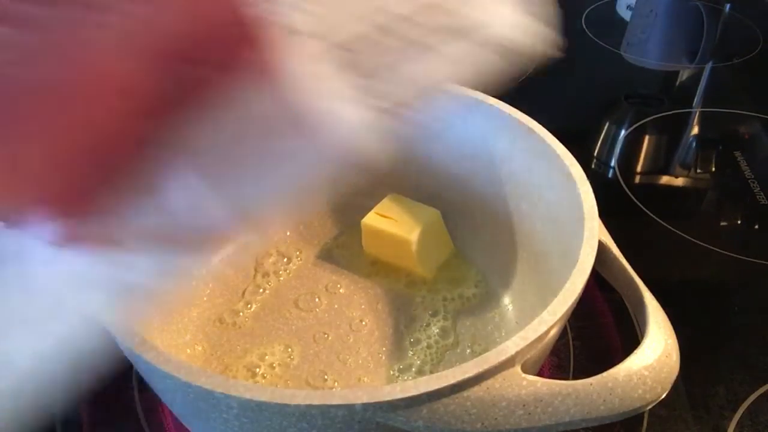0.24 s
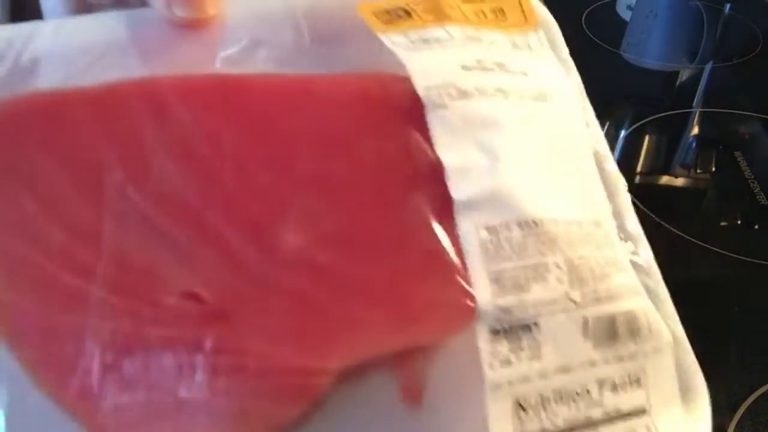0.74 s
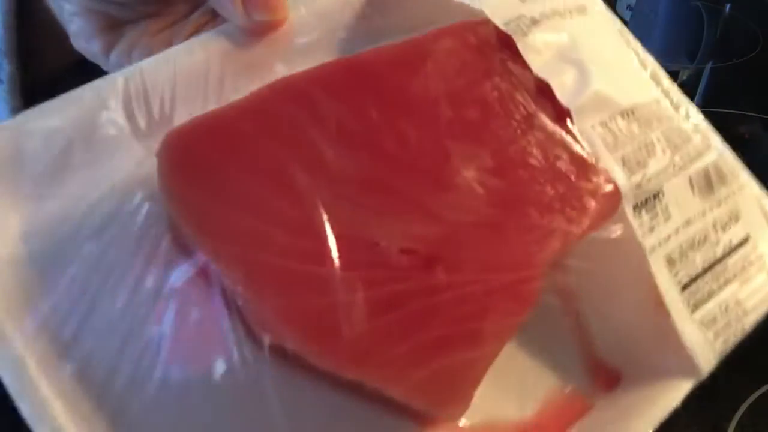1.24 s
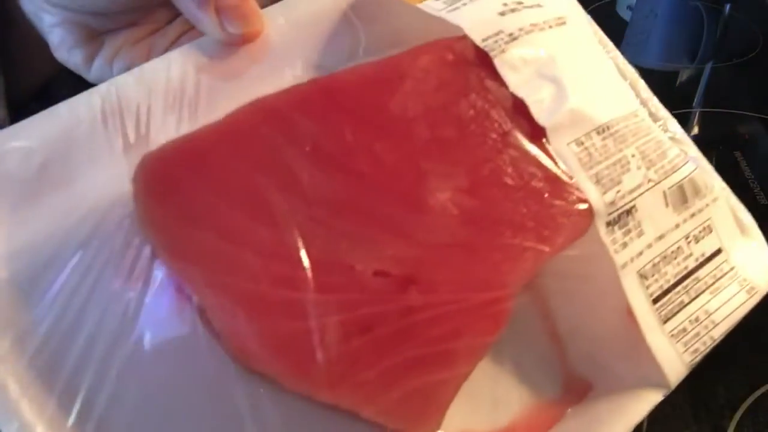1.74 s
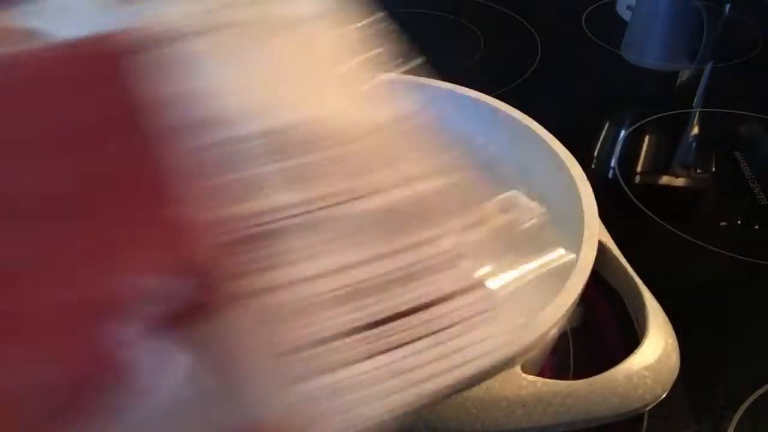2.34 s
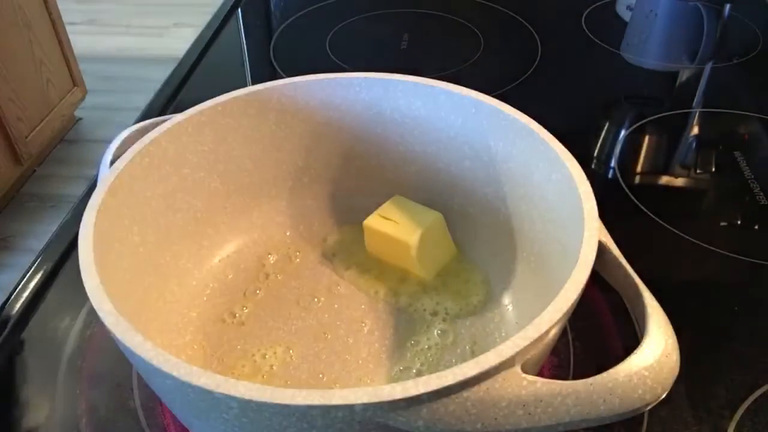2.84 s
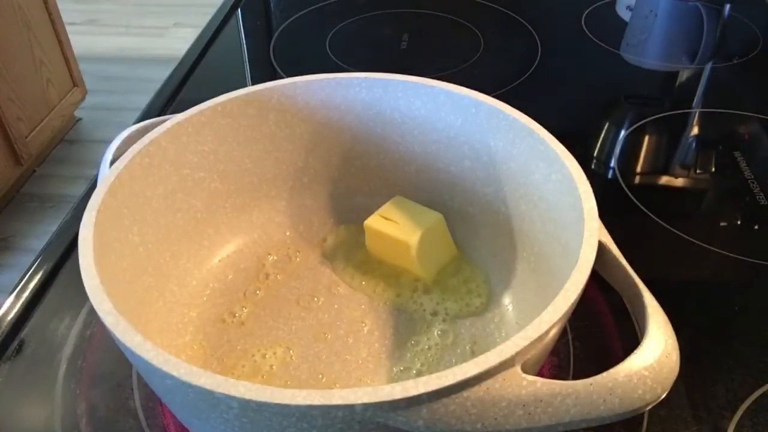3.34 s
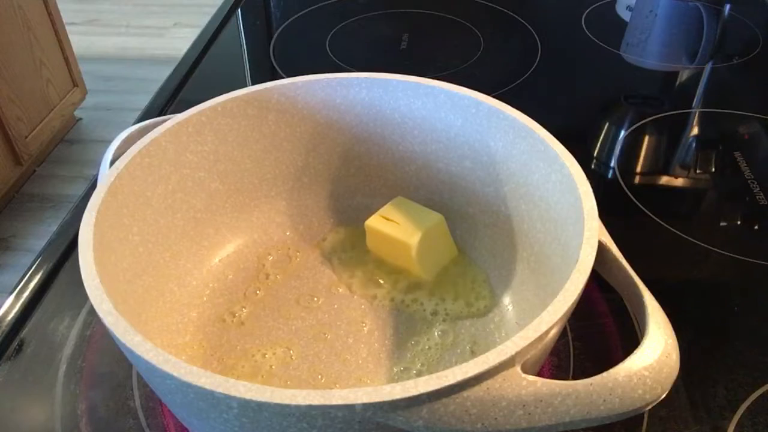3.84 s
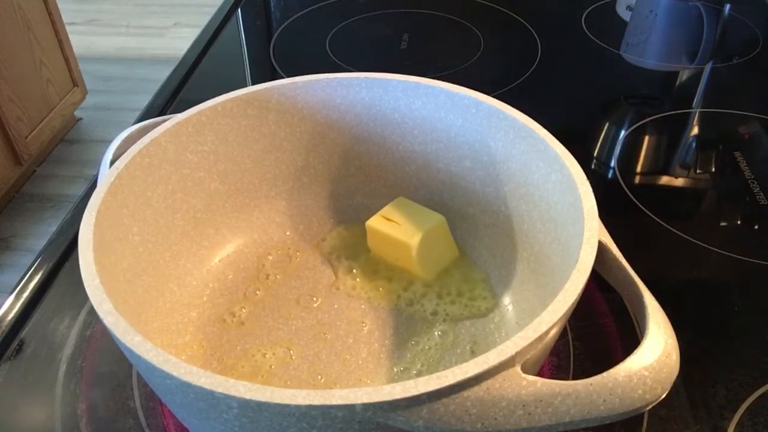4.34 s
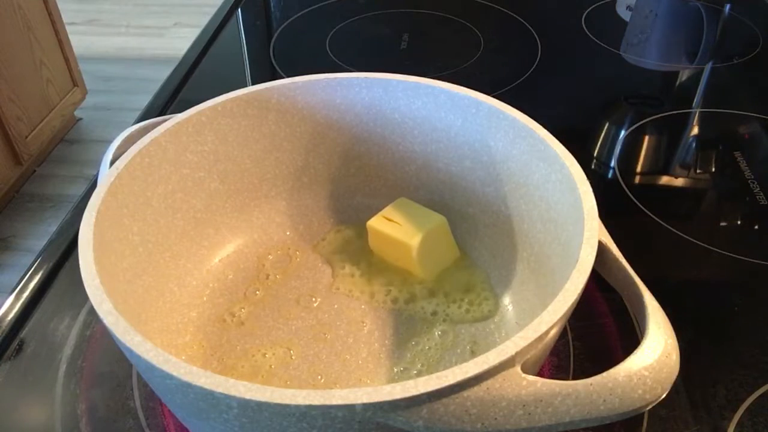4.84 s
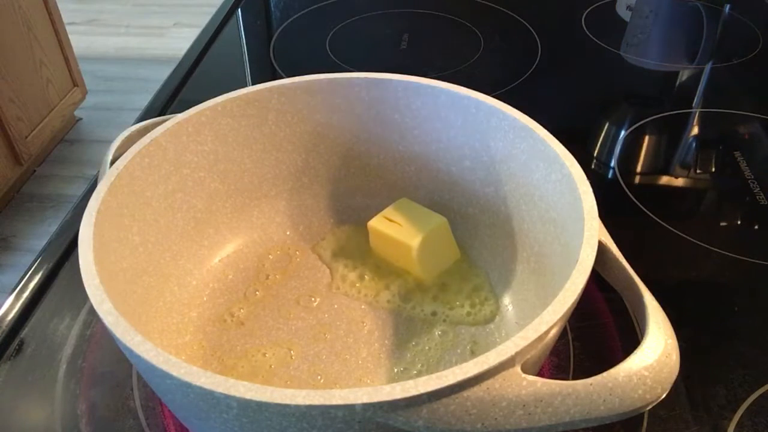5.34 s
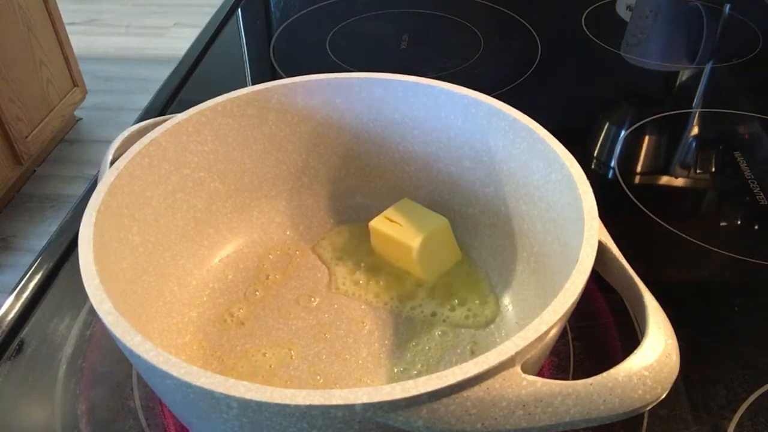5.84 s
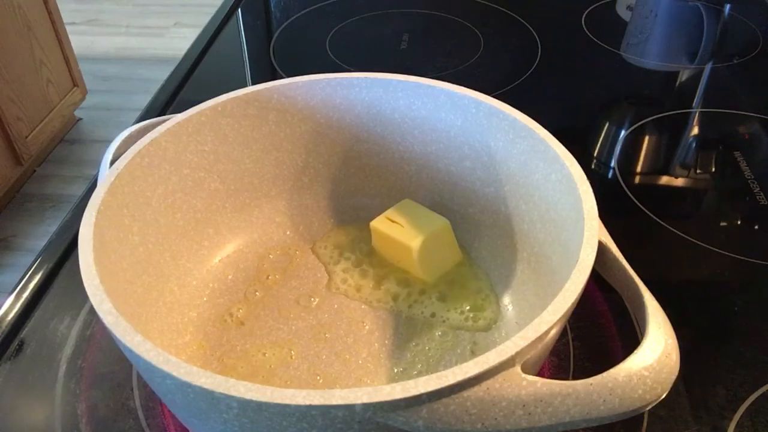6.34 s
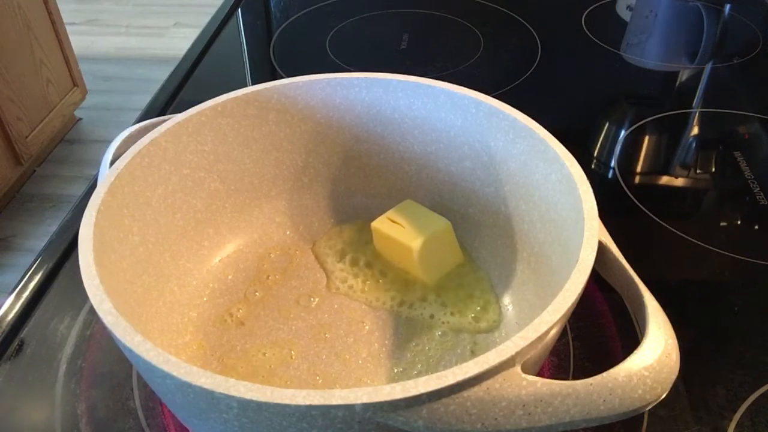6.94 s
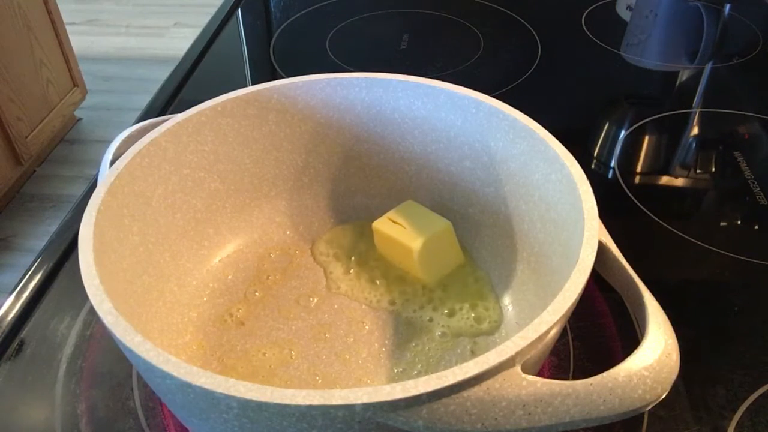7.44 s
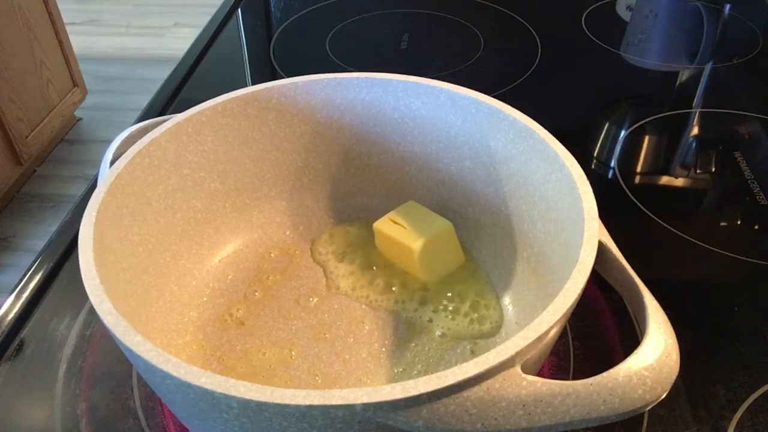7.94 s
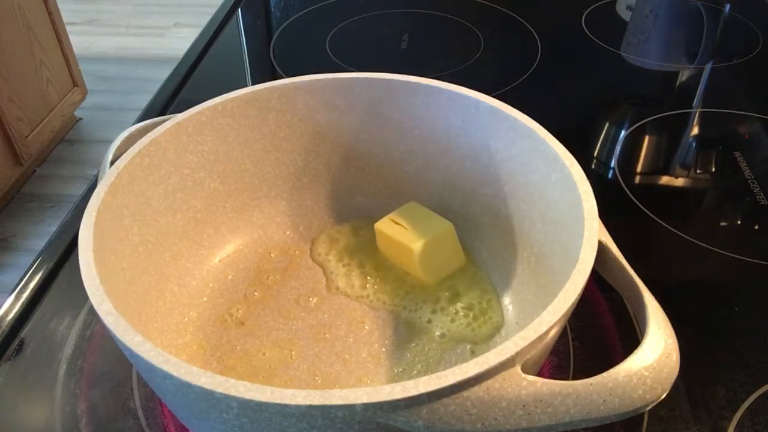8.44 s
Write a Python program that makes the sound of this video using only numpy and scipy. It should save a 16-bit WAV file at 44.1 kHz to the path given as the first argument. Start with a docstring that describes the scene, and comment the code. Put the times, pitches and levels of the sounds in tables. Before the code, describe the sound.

Close, crackly frying of butter dips and dulls for two seconds, returns bright, then a tray clacks down amid pops and light knocks.

```python
"""In a kitchen, one microphone above a hot pot on a humming glass hob: a lump of butter sizzles.
Steam bubbles bursting in the fat are short rings, in clumps, coloured by the pot; fat spits and sprays.
A plastic tray held over the pot for two seconds screens the sizzle, and cookware clinks lightly.
The tray is carried aside and set down with a clack, then softer handling knocks follow.
Blows are runs of tiny touches through hollow resonances; hum and room noise lie behind."""
import sys
import numpy as np
from scipy import signal
from scipy.fft import rfft, irfft
from scipy.io import wavfile

SR = 44100
rng = np.random.default_rng(int(sys.argv[2]) if len(sys.argv) > 2 else 0)


def unload_wav(signal):
    """Save mono or channel-first audio to the path in sys.argv[1] as 16-bit WAV at rate SR, clipped to [-1, 1]."""
    wavfile.write(
        sys.argv[1],
        SR,
        np.round(np.clip(np.atleast_2d(signal).T, -1, 1) * 32767).astype(np.int16),
    )


N = 383229
T = np.arange(N) / SR   # time in s of every sample

# sizzle straight from the pot: pitch_hz [Hz], density_db [dB per Hz]
OPEN_COLOUR = [(150, -36), (490, -28), (1100, -22), (1600, -21.5), (2400, -7), (3000, -2.5), (4200, 2),
               (5000, 0.5), (6600, 0), (8200, -11), (9800, -13), (10400, -21), (11300, -15.5), (15800, -25)]
# sizzle arriving around the tray: pitch_hz [Hz], density_db [dB per Hz]
SCREENED_COLOUR = [(150, -19), (600, -15), (1150, -23), (1400, -10), (2400, -7), (3700, 0.5), (5100, -4),
                   (6000, -4), (7200, -7), (7900, -13), (9200, -14.5), (10400, -24), (11400, -19.5),
                   (15800, -37.5)]
# air modes and nulls of the open pot: pitch_hz [Hz], width_hz [Hz], lift_db [dB]
OPEN_POT_MODES = [(740, 180, 5.5), (1070, 18, 1), (1312, 240, 8.5), (2020, 300, 9), (2270, 116, -15),
                  (2687, 94, 7), (3255, 215, 6.5), (4116, 160, 3.5), (4490, 180, 3), (4680, 140, -4),
                  (5980, 350, 3), (6500, 160, -6.5), (6840, 100, 5.5), (8650, 780, -1.5)]
# air modes of the covered pot: pitch_hz [Hz], width_hz [Hz], lift_db [dB]
COVERED_POT_MODES = [(707, 190, 3.2), (1358, 285, 8.5), (2063, 144, 7.6), (2660, 200, 4), (3050, 90, 5.7),
                     (4570, 84, 3.3), (5820, 150, 6), (7840, 200, 1)]
# fine spray of droplets: time_s [s], level_db [dB, relative to the sizzle, before a fixed trim]
SPRAY_LEVEL = [(0, -11), (.7, -13), (1.3, -19), (2.1, -21), (2.45, -10.5), (2.85, -17), (3.15, -22),
               (4.4, -16.5), (5.5, -18.5), (6.4, -26), (7.45, -16), (8.25, -25), (8.42, -10.5), (8.69, -12)]
# large bubbles bursting: start_s [s], level_db [dB, before echoes and band filter], pitch_hz [Hz]
POPS = [(3.3884, -12.5, 3290), (3.4014, -11, 4000), (3.752, -11, 3860), (4.0557, -16, 3990),
        (4.09, -16, 6060), (4.125, -16, 6010), (4.3098, -16, 4070), (4.3585, -9, 5700), (4.4918, -9, 6000),
        (4.7716, -20, 4600), (5.2771, -7.5, 4060), (5.8531, -13.5, 4170), (5.9206, -14, 5860),
        (6.642, -13, 3330), (6.691, -12, 3670), (7.2047, -12, 4500), (7.736, -14, 4070), (8.095, -13, 3430),
        (8.2311, -11, 3450)]
# tiny spits of fat: start_s [s], level_db [dB], both before a small fixed shift
SPITS = [(2.848, -17), (4.6957, -22), (5.1537, -21), (5.8985, -21), (8.3966, -20)]
# fingers tick on the held tray: start_s [s], level_db [dB], hardness_db [dB the clack gains, the thud loses]
TAPS = [(.210, -35.5, 3), (0.355, -49, 2), (.389, -44.5, 2), (.453, -44.5, 0), (1.011, -44, -5)]
# dull double bump as the tray is carried aside: start_s [s], level_db [dB], thud_hz [Hz]
BUMPS = [(3.049, -49, 150), (3.078, -52, 100)]
# the stiff rim hits and rebounds: start_s [s], level_db [dB peak, before room echoes]
RIM_HITS = [(3.4649, -1.5), (3.4726, -13), (3.477, -10)]
# the tray slides and settles after landing: start_s [s], level_db [dB]
SCUFFS = [(3.592, -42), (3.684, -45), (3.757, -40), (3.905, -39), (3.944, -47)]
# things knock on the counter: start_s [s], level_db [dB],
# hardness_db [dB the clack gains, the thud loses], thud_hz [Hz]
KNOCKS = [(3.550, -39.5, 6, 200), (3.779, -44, 4, 150), (4.896, -44, -1, 330), (5.051, -40.5, 2.5, 340),
          (5.379, -37.5, -2.5, 494), (5.850, -50, 3, 350), (6.668, -52, -9, 360), (6.946, -44, -2, 280),
          (7.035, -56, -10, 260), (7.763, -46, 3.5, 300)]
# colour of the hollow knock: pitch_hz [Hz], density_db [dB per Hz]
KNOCK_COLOUR = [(150, -4), (370, -11.5), (520, -5), (750, 5), (1200, 3.5), (2000, -28.5), (5000, -16)]
# colour of the plastic clack: pitch_hz [Hz], density_db [dB per Hz]
CLACK_COLOUR = [(500, -31), (950, -8), (1450, 3.5), (2700, 7.5), (4000, -1.5), (6500, -8), (8000, -10.5),
                (16000, -22)]
# colour of the thud: pitch_hz [Hz], density_db [dB per Hz]
THUD_COLOUR = [(100, -12.5), (400, -8), (1500, -19.5), (5000, -47)]
# hollow resonances of the knocks: pitch_hz [Hz], width_hz [Hz], lift_db [dB]
HOLLOW_MODES = [(404, 95, 7), (1088, 93, 4.5), (1260, 110, 3), (1510, 170, 5), (1854, 83, 5)]
# note lingering after a blow: pitch_hz [Hz], level_db [dB, before the blow's own level], t60_s [s]
KNOCK_RING = [(1095, -36.5, 0.17), (2148, -35, 0.22)]
# a light clink of cookware: start_s [s], level_db [dB peak of the tick, before its echoes and ring]
CLINK = (1.9354, -16)
# colour of the clink's first tick: pitch_hz [Hz], density_db [dB per Hz]
TICK_COLOUR = [(600, -37), (1500, -22), (3100, 4), (4500, 1), (5900, 2), (7200, -28), (16000, -38)]
# faint ring of the clink: pitch_hz [Hz], level_db [dB, relative to the tick], t60_s [s]
CLINK_RING = [(3150, -28.5, 1.1), (3220, -30, .5), (5770, -38, 0.57)]
# hum of hob and kitchen appliances: pitch_hz [Hz], level_db [dB rms, before waver and background gain]
HUM = [(49.2, -53), (98.5, -56.5), (120, -61), (157.2, -82.5), (197, -65), (295.7, -66)]
# colour of the room noise: pitch_hz [Hz], density_db [dB per Hz]
ROOM_COLOUR = [(20, -26), (42, -6), (64, 0), (80, -9), (110, -6), (145, -7.5), (175, -10.5), (215, -0.5),
               (260, -6.5), (400, -10.5), (900, -14), (3000, -12), (16000, -30.5)]
# gain on hum and room noise, which steps up near the end: time_s [s], gain_db [dB]
BACKGROUND_GAIN = [(0, -1), (8.3, -2), (8.37, 2), (8.69, 1.5)]

# the sizzle grows slowly as the melted butter spreads, and wavers a little
SIZZLE_DB, GROWTH_DB_PER_S = -32.5, 0.3155
WAVER_DB, WAVERS_PER_S = 0.7, 7.7
WASH_PER_S = 0.032   # growth, with the pool, of the share arriving as a dull wash
# the tray moves over the pot and away again: (start_s, end_s) of each move
TRAY_IN_S, TRAY_OUT_S = (0.083, 0.36), (2.31, 2.52)
# loss as the tray arrives; it then tilts and lets more past
TRAY_LOSS_DB, TRAY_LEAK_DB_PER_S = 9.5, 0.9


def sizzle():
    """Bursts coloured by the pot; the tray blocks the direct path and leaves a duller, smoother wash."""
    level_db, screen = frying()
    spray_db, = in_time(SPRAY_LEVEL)
    bursts = bubbles(631, 14400, per_s=11000, spread_db=4.0, top_db=19.0, cycles=12.1,
                     clump_db=1.68, wall_db=-6.5, wall_t60=0.015, count=20)
    # fixed paths by way of hob and walls ripple the colour; the rest of the room blurs it
    near = through(bursts, echoes(0.053))
    wash = 0.78 * scatter(bursts, 0.11) + 0.43 * through(bursts, echoes(0.24))
    open_mix = bursts + from_db(-15) * near + from_db(-7.5) * wash
    direct = rms_one(through(open_mix, body(OPEN_COLOUR, OPEN_POT_MODES)))
    screened_mix = bursts + from_db(-1) * wash
    around = rms_one(through(screened_mix, body(SCREENED_COLOUR, COVERED_POT_MODES)))
    fat = np.sqrt(1 - screen) * direct + np.sqrt(screen) * around
    # the finest droplets tick sharply in the top octave
    spray = bubbles(8300, 14600, per_s=1100, spread_db=4.5, top_db=27.5, cycles=10,
                    clump_db=0.5, wall_db=0, wall_t60=0.047, count=4)
    return from_db(level_db) * (from_db(-1.25) * fat + from_db(spray_db - 3) * spray)


def frying():
    """Sizzle level in dB before mixing, and the share of its power (0-1) that comes by indirect paths."""
    cover = ramp(*TRAY_IN_S) - ramp(*TRAY_OUT_S)
    loss_db = cover * (TRAY_LOSS_DB - TRAY_LEAK_DB_PER_S * (T - TRAY_IN_S[1]))
    waver_db = WAVER_DB * drift(WAVERS_PER_S)
    level_db = SIZZLE_DB + GROWTH_DB_PER_S * T + waver_db - loss_db
    return level_db, np.clip(cover + WASH_PER_S * T, 0, 1)


def bubbles(low_hz, high_hz, per_s, spread_db, top_db, cycles, clump_db, wall_db, wall_t60, count=16):
    """Many small bursts and a few big ones, in clumps, at pitches spread over the range; rms 1."""
    out = np.zeros(N)
    chance = per_s / count / SR * from_db(clump_db * drift(70))
    for hz in np.geomspace(low_hz, high_hz, count):
        born = rng.random(N) < chance
        sizes = from_db(np.minimum(spread_db * rng.exponential(1, N), top_db))
        clicks = born * sizes * np.sign(rng.random(N) - .5)
        heard = clicks + from_db(wall_db) * scatter(clicks, wall_t60)
        band = rms_one(through(heard, np.diff(ring(hz, cycles))))
        out += np.sqrt(hz) * band   # even power per Hz
    return rms_one(out)


def pops():
    """Big bubbles and spits, each a short ring with wall reflections, stand out of the sizzle."""
    out = np.zeros(N)
    for s, db, hz in POPS:
        add(out, s, from_db(db) * burst(hz, cycles=17, wall_db=-21.0, wall_t60=0.043))
    band = signal.butter(3, [2400, 8000], "band", fs=SR, output="sos")
    out = signal.sosfilt(band, out + 1e-18)
    for s, db in SPITS:
        spit = burst(11800, cycles=9.8, wall_db=-3, wall_t60=.025)
        add(out, s + 0.001, from_db(db + 0.5) * spit)
    return out


def burst(hz, cycles, wall_db, wall_t60, size=2048):
    """One bubble: its ring, then its reflections between the pot's walls."""
    paths = signal.unit_impulse(size) + from_db(wall_db) * echoes(wall_t60, size=size)
    return through(paths, ring(hz, cycles))


def ring(hz, cycles, size=1024):
    """A bubble's short ring, 60 dB down after so many cycles; peak 1."""
    t = T[:size]
    wave = np.sin(2 * np.pi * hz * t) * from_db(-60 * t * hz / cycles)
    return wave / np.abs(wave).max()


def handling():
    """The tray is fingered, bumped, dropped and slid into place; knocks on the counter follow."""
    out = np.zeros(N)
    for s, db, hard_db in TAPS:
        tap = contact(rise=0.0016, t60=0.015, strike_db=21, clack_db=hard_db, thud_db=-9.5 - hard_db,
                      thud_hz=240, ring_db=-18, grain_db=2.5)
        add(out, s, from_db(db) * tap)
    for s, db, hz in BUMPS:
        bump = contact(rise=0.00296, t60=.12, strike_db=17, clack_db=11.5, thud_db=8,
                       thud_hz=hz, ring_db=2, grain_db=2.5)
        add(out, s, from_db(db) * bump)
    for s, db in SCUFFS:
        scuff = contact(rise=0.0078, t60=.18, strike_db=4, clack_db=9.5, thud_db=-20,
                        thud_hz=261, ring_db=-8, grain_db=5.0)
        add(out, s, from_db(db) * scuff)
    for s, db, hard_db, hz in KNOCKS:
        knock = contact(rise=0.0023, t60=0.077, strike_db=20.5, clack_db=9.5 + hard_db,
                        thud_db=-7 - hard_db, thud_hz=hz, ring_db=1.5, grain_db=2.0)
        add(out, s, from_db(db) * knock)
    # the tray shudders under its first hit
    shudder = contact(rise=0.0006, t60=.08, strike_db=3, clack_db=15.5, thud_db=-8.0,
                      thud_hz=110, ring_db=-3, grain_db=4.0)
    add(out, RIM_HITS[0][0], from_db(-33.5) * shudder)
    clack = body(CLACK_COLOUR, HOLLOW_MODES)
    for s, db in RIM_HITS:
        add(out, s, from_db(db) * clack / np.abs(clack).max())
    return out + from_db(-8.0) * through(out, echoes(0.72))


def contact(rise, t60, strike_db, clack_db, thud_db, thud_hz, ring_db, grain_db, size=16384):
    """A strike and a dying run of tiny touches sound a hollow, ringing knock, a plastic clack and a thud."""
    t = T[:size]
    force = np.minimum(t / rise, from_db(-60 * (t - rise) / t60))
    grain = from_db(grain_db * np.minimum(rng.exponential(1, size), 4))
    touches = force * rms_one(rng.standard_normal(size) * grain)
    touches[int(rise * SR)] += from_db(strike_db)
    hollow = body(KNOCK_COLOUR, HOLLOW_MODES)
    clack = from_db(clack_db) * body(CLACK_COLOUR, HOLLOW_MODES)
    thud = from_db(thud_db) * body(THUD_COLOUR, [(thud_hz, 0.74 * thud_hz, 14)])
    note = ringing(KNOCK_RING, t)
    return through(touches, hollow + clack + thud) + from_db(ring_db) * through(touches, note)


def clink():
    """Cookware touched lightly: a sharp tick with close echoes and a faint, long ring."""
    s, peak_db = CLINK
    out = np.zeros(N)
    tick = body(TICK_COLOUR)
    tick = tick / np.abs(tick).max()
    add(out, s, tick + from_db(-1.5) * through(tick, echoes(0.028)))
    add(out, s, ringing(CLINK_RING, T[:SR]))
    return from_db(peak_db) * out


def kitchen():
    """Slightly wavering hum over soft room noise, under one common gain."""
    hum = np.zeros(N)
    for hz, db in HUM:
        level = from_db(db + 0.38 * drift(4.7)) * np.sqrt(2)   # rms to peak
        phase = 2 * np.pi * (hz * T + rng.random()) + 0.087 * drift(6.1)
        hum += level * np.sin(phase)
    air = from_db(-57.5) * rms_one(through(rng.standard_normal(N), body(ROOM_COLOUR)))
    gain_db, = in_time(BACKGROUND_GAIN)
    return from_db(gain_db) * (hum + air)


def ringing(modes, t):
    """Sum of sine modes (Hz, dB, t60 s), each dying exponentially."""
    return sum(from_db(db - 60 * t / t60) * np.sin(2 * np.pi * hz * t) for hz, db, t60 in modes)


def body(spectrum, modes=(), size=4096):
    """Causal (minimum-phase) response of energy 1 with this colour and these resonances."""
    hz = np.maximum(np.fft.rfftfreq(size, 1 / SR), 1)
    points = np.array(spectrum)
    db = np.interp(np.log(hz), np.log(points[:, 0]), points[:, 1])
    for centre, width, lift in modes:
        db = db + lift / (1 + (2 * (hz - centre) / width) ** 2)
    # folding the cepstrum forward in time gives minimum phase
    cepstrum = irfft(np.log(from_db(db)))
    cepstrum[1:size // 2] *= 2
    cepstrum[size // 2 + 1:] = 0
    response = irfft(np.exp(rfft(cepstrum)))
    return response / np.linalg.norm(response)


def echoes(t60, size=16384):
    """Dense reflections dying away, energy 1."""
    tail = rng.standard_normal(size) * from_db(-60 * T[:size] / t60)
    return tail / np.linalg.norm(tail)


def scatter(clicks, t60, size=8192):
    """Every click is followed by its own dense, dying reflections, of about the same energy as itself."""
    decay = from_db(-120 * T[:size] / t60)   # of power
    power = through(clicks ** 2, decay / decay.sum())
    return np.sqrt(np.maximum(power, 0)) * rng.standard_normal(len(clicks))


def through(x, response):
    """Pass a sound through an impulse response."""
    return signal.oaconvolve(x, response)[:len(x)]


def drift(per_s):
    """Smooth random wander, rms 1, with so many random points a second."""
    knots = rng.standard_normal(N // 10)
    return rms_one(np.interp(T * per_s, np.arange(len(knots)), knots))


def ramp(start, end):
    """Rises from 0 to 1 between two times."""
    return np.clip((T - start) / (end - start), 0, 1)


def in_time(rows):
    """Each column of a curve at every sample."""
    s, *columns = np.transpose(rows)
    return [np.interp(T, s, c) for c in columns]


def from_db(db):
    """Decibels to gain."""
    return 10 ** (np.asarray(db) / 20)


def rms_one(x):
    """Scale to rms 1."""
    return x / np.sqrt(np.mean(x ** 2) + 1e-20)


def add(out, s, sound):
    """Mix a sound in at time s."""
    at = int(s * SR)
    out[at:at + len(sound)] += sound[:N - at]


def scene():
    """Everything at one microphone above the pot."""
    return (sizzle() + pops() + handling() + clink() + kitchen())[None, :]


def record(dry):
    """The top is cut steeply above 15.8 kHz."""
    return signal.sosfilt(signal.ellip(12, .1, 80, 15800, fs=SR, output="sos"), dry)


dry = scene()
out = record(dry)
unload_wav(out)
```